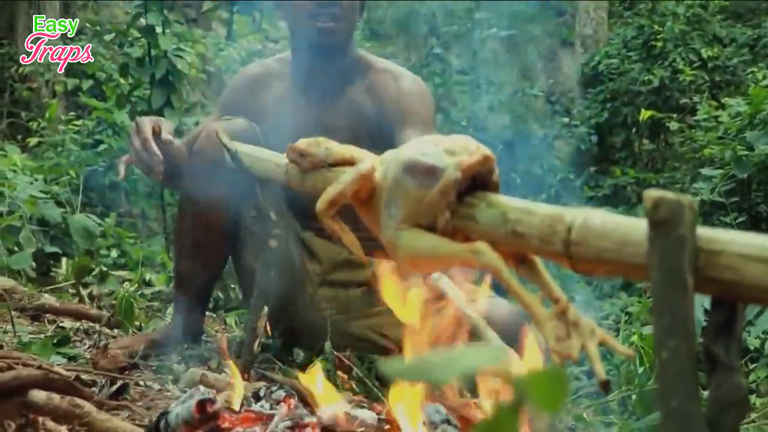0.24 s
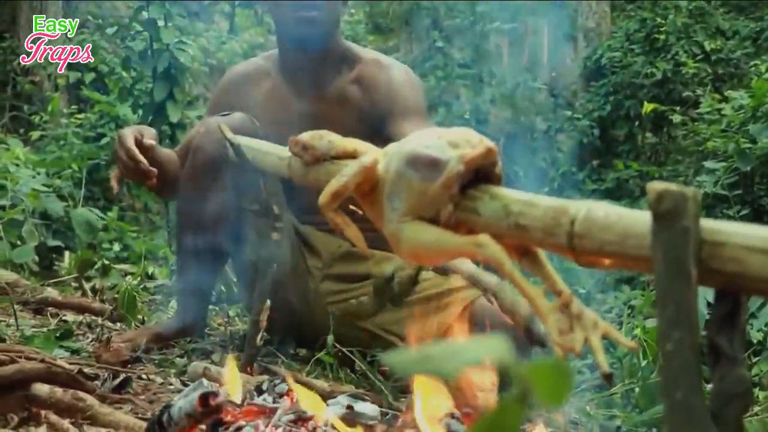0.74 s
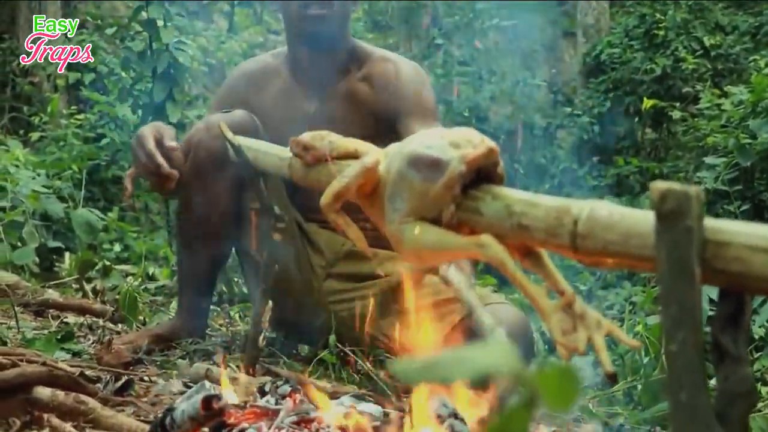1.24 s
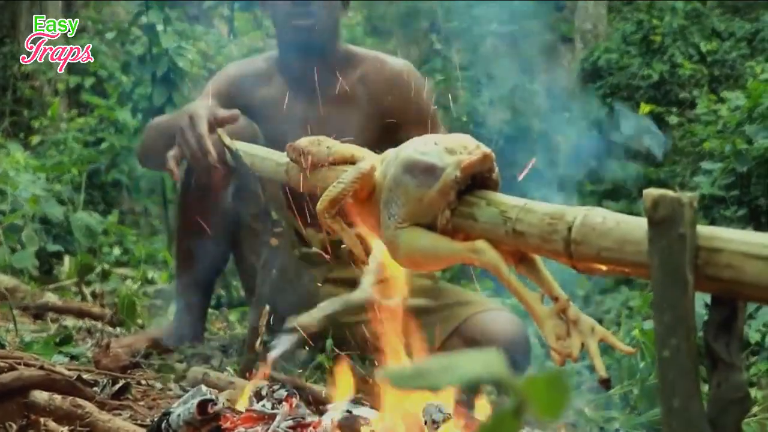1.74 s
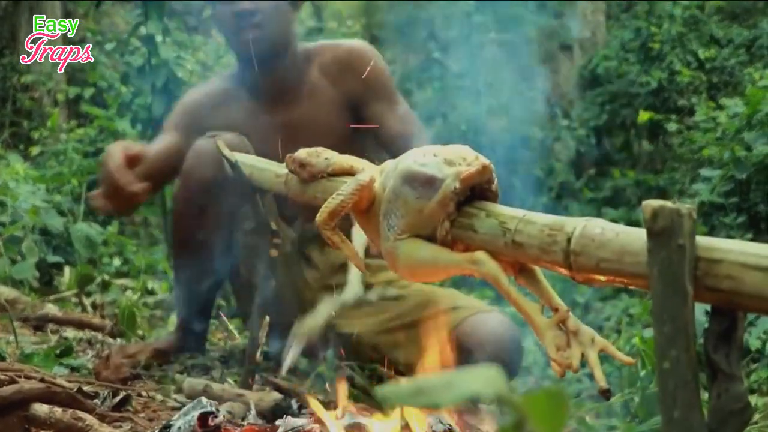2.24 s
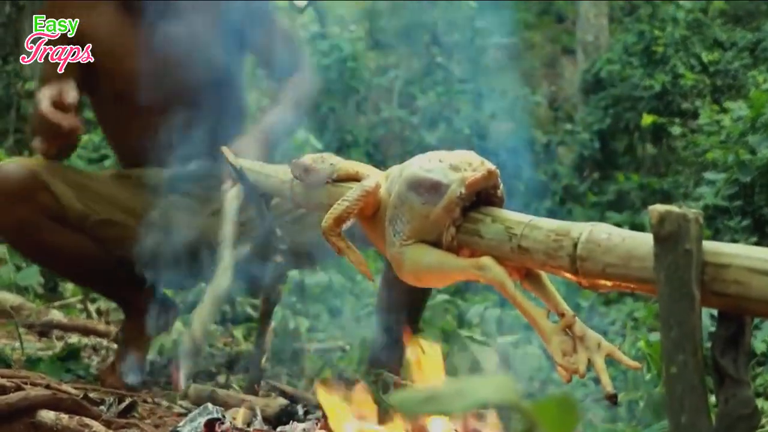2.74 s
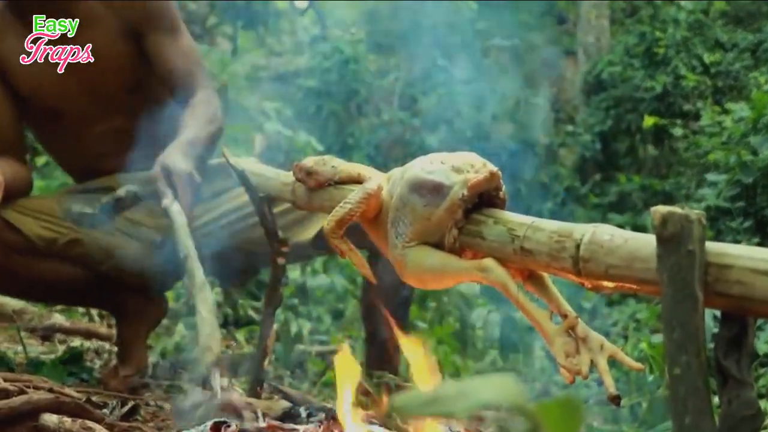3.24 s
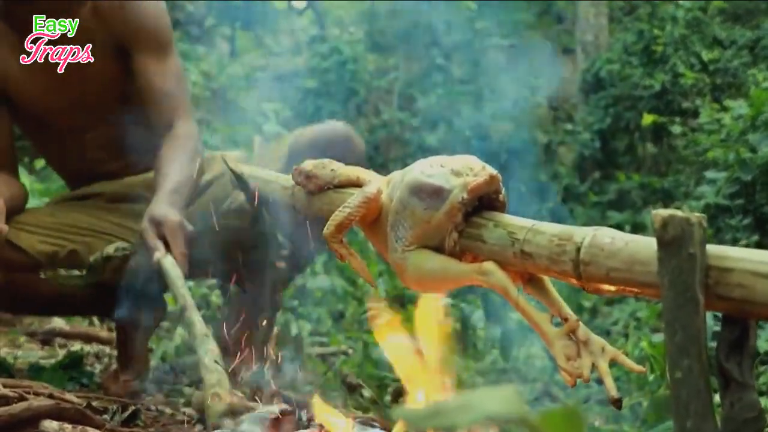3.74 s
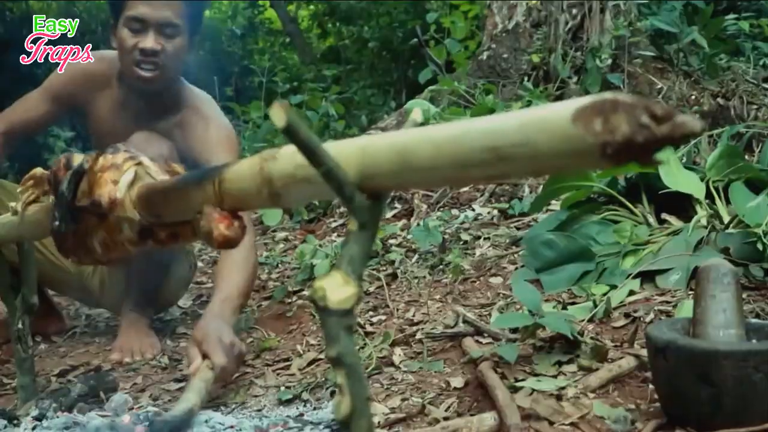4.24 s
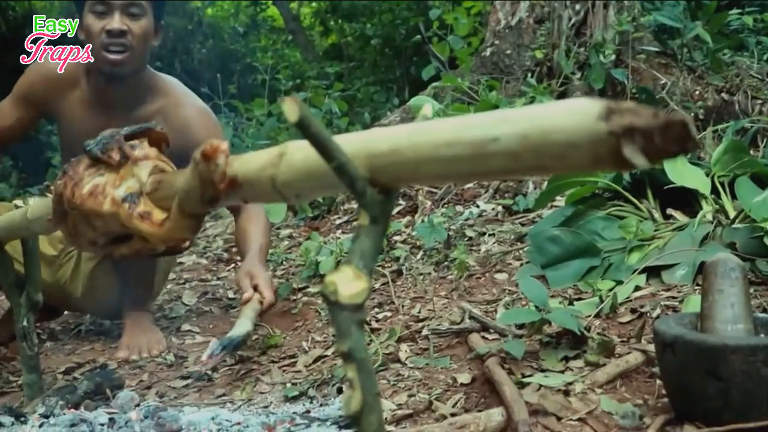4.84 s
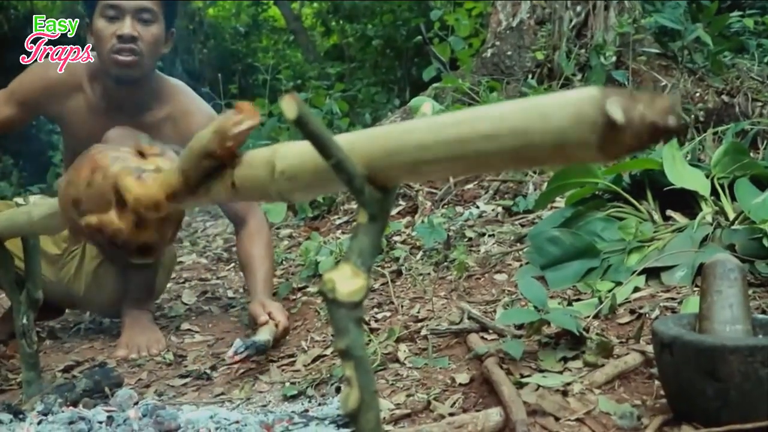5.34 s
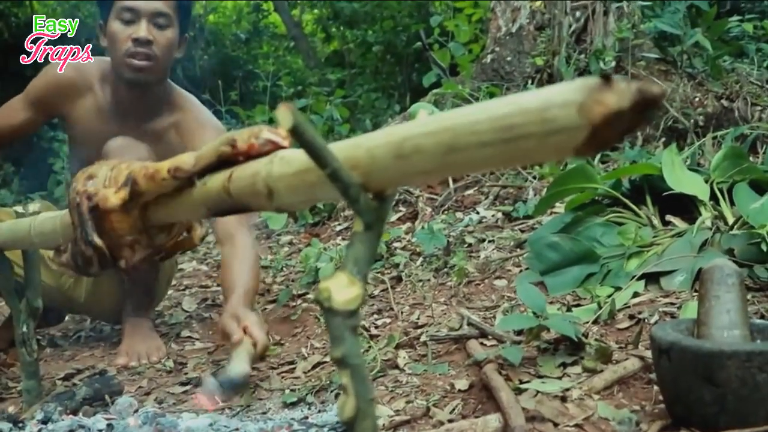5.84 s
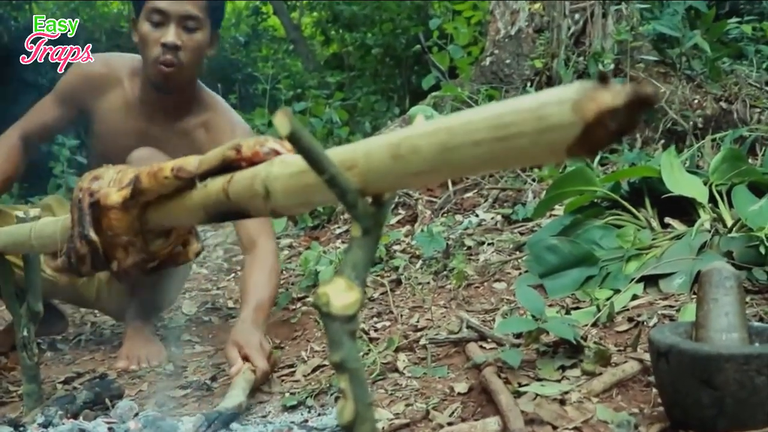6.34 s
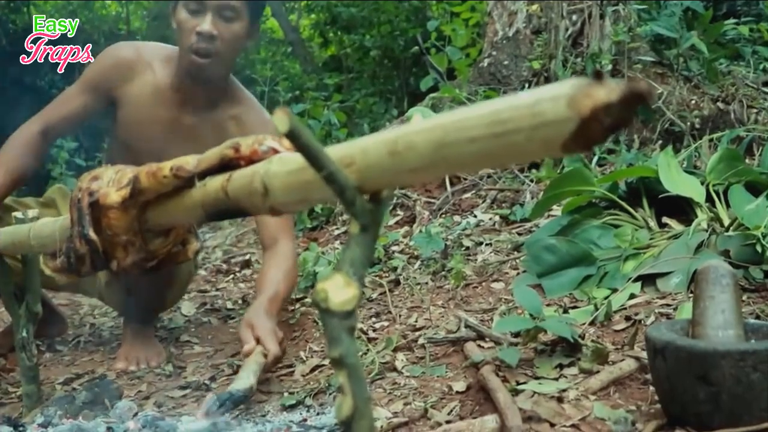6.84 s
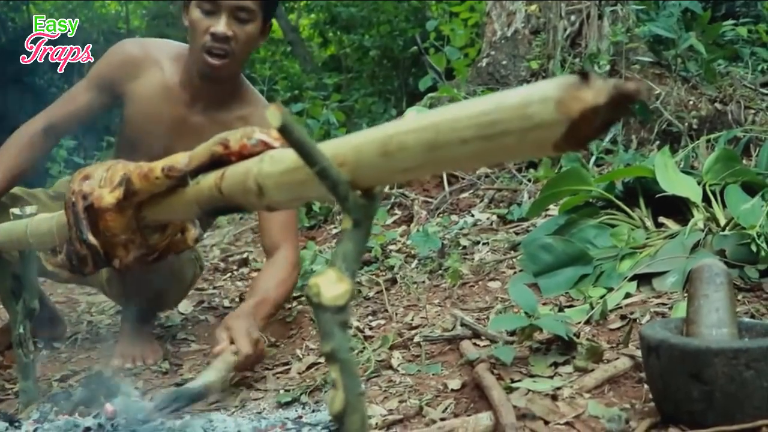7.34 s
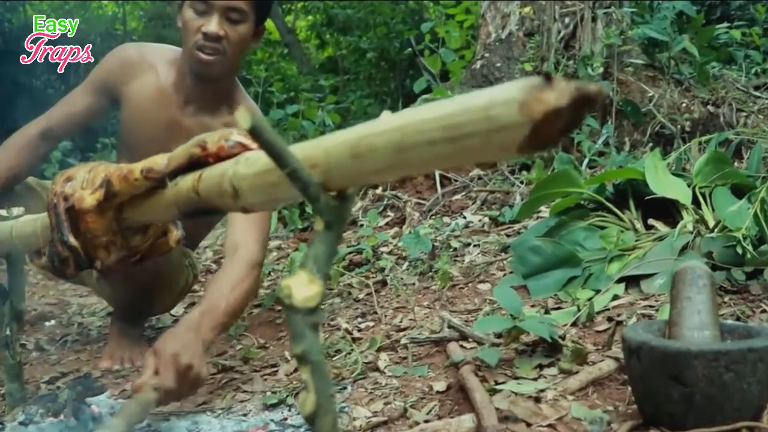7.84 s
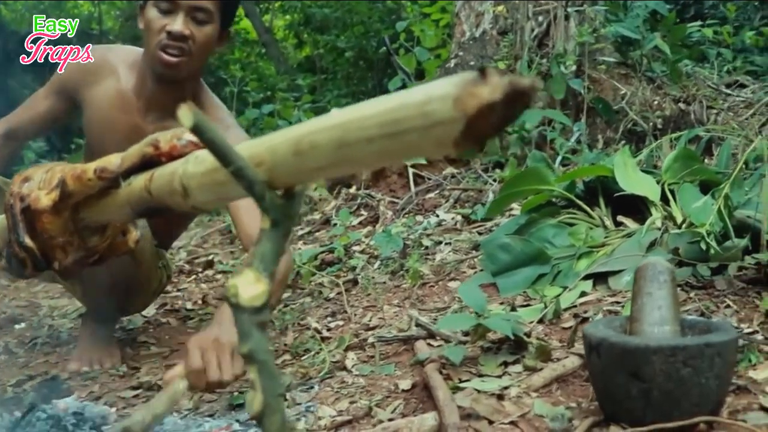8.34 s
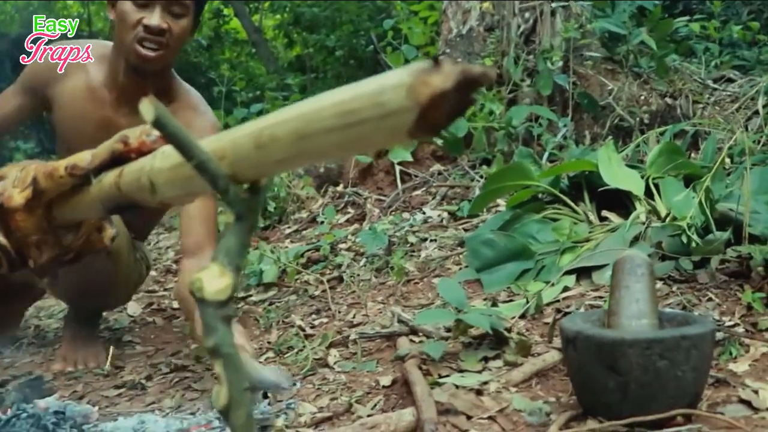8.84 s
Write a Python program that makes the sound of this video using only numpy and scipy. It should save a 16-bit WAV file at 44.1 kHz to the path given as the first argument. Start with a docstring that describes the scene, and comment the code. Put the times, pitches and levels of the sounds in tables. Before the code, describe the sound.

A mimicking bird hoots, trills and whistles among ringing forest trunks while a campfire hisses, snaps and a stick rakes the embers.

```python
"""Forest camp: a mimicking bird sings, centred and ringing among trunks, beside a stereo fire.
Its hoots, pips, rasps, trill and whistles are near sines that follow note tables and flutter.
The fire is patchy noise with rung noise bursts for snaps; a stick raking the embers swells the hiss.
A bamboo spit creaks twice in its fork: slip clicks and grit ring resonances that climb.
Air, insects and, at first, a low flapping of flames lie behind."""
import sys
import numpy as np
from scipy import signal
from scipy.fft import rfft, irfft, next_fast_len
from scipy.io import wavfile
from scipy.ndimage import uniform_filter1d

SR = 44100
rng = np.random.default_rng(int(sys.argv[2]) if len(sys.argv) > 2 else 0)


def int16_out(signal):
    """Quantize to a 16-bit WAV file."""
    q = np.round(np.clip(np.atleast_2d(signal).T, -1, 1) * 32767)
    wavfile.write(sys.argv[1], SR, q.astype(np.int16))


N = 400428
T = np.arange(N) / SR
SIDES = np.array([[1], [-1]])  # left, right in antiphase
TURN_S = 4.7  # until then the fire lies left, its hiss is duller and insects sound


def undb(db):
    """Amplitude ratio of a level in dB."""
    return 10 ** (np.asarray(db) / 20)


def unit(x):
    """Scale to RMS 1."""
    return x / np.sqrt(np.mean(x ** 2))


def ring(x, modes):
    """Sum of broad resonances, each (centre Hz, width Hz, gain dB)."""
    out = 0
    for hz, width_hz, db in modes:
        out = out + undb(db) * signal.lfilter(*signal.iirpeak(hz, hz / width_hz, SR), x)
    return out


def walk(rate_hz):
    """Random levels held 1 / rate_hz seconds and slewed twice; RMS 1."""
    k = int(SR / rate_hz)
    steps = np.repeat(rng.standard_normal(N // k + 1), k)
    slewed = uniform_filter1d(uniform_filter1d(steps, k), k)
    return unit(slewed[:N])


def colour(spectrum):
    """Steady noise of RMS 1, its spectrum drawn through (Hz, relative dB) points on a log axis."""
    hz, db = np.transpose(spectrum)
    f = np.maximum(np.fft.rfftfreq(N, 1 / SR), 1)
    gain = undb(np.interp(np.log(f), np.log(hz), db))
    return unit(irfft(rfft(rng.standard_normal(N)) * gain, N))


# Lone echoes off trunks. Each row: delay in seconds, level in dB re direct sound.
TRUNK_ECHOES = [(.004, -18), (.041, -19)]
WOOD_T60_S, NEAR_S, NEAR_DB = 0.46, 0.05, 5
WOOD_DB = -3  # scatter energy re direct sound, before its high-pass
CEILING = 0.18


def bird():
    """Song through the wood: lone echoes, dense near scatter, far tail; a limiter rounds the crests."""
    song = calls()
    high = signal.sosfilt(signal.butter(4, 1500, "high", fs=SR, output="sos"), song)
    squared = high ** 2
    octave = unit(squared - uniform_filter1d(squared, size=40))
    song = song + undb(-34) * octave * np.std(song)

    t = T[:SR]
    near = undb(NEAR_DB / (1 + (t / NEAR_S) ** 8))
    onset = np.clip(t / 0.0025, 0, 1)
    wood = rng.standard_normal(SR) * undb(-60 * t / WOOD_T60_S) * near * onset
    wood *= undb(WOOD_DB) / np.sqrt(np.sum(wood ** 2))
    wood = signal.lfilter(*signal.butter(1, 1400, "high", fs=SR), wood)  # low notes bend round trunks
    wood[0] = 1  # direct sound
    for delay_s, db in TRUNK_ECHOES:
        wood[int(delay_s * SR)] += undb(db)
    wet = signal.fftconvolve(song, wood)[:N]

    envelope = np.abs(signal.hilbert(wet, next_fast_len(N))[:N])
    held = wet / (1 + (envelope / CEILING) ** 8) ** (1 / 8)
    return held / (1 + (.93 * held / CEILING) ** 8) ** (1 / 8)


def calls():
    """Every note of the song, each kind in its own voice."""
    return (trill() + hoots() + clear_whistles() + pips() + rasps() + rattle()
            + warbles() + ripples() + buzzes() + tweets() + burr())


# Trill. Each row: start in seconds, top pitch in Hz.
TRILL = [(1.955, 6410), (2.043, 6430), (2.132, 6580), (2.229, 6470), (2.322, 6410), (2.417, 6330),
         (2.518, 6290), (2.618, 6210)]
# Whip, lead whip just ahead, half-pitch line.
# Each row: seconds from stroke start, share of top pitch, level in dB re TRILL_DB.
STROKE = [(-.002, .4, -22), (.001, .62, -2), (.004, .8, 0), (.008, .94, -14), (.022, 1.0, -9),
          (.055, 1.0, -13)]
LEAD = [(-.006, .5, -9), (-.001, .86, -5)]
UNDER = [(-.007, .22, -14), (-.002, .3, -11), (.002, .4, -32), (.012, .49, -17), (.045, .5, -21)]
TRILL_DB = -30


def trill():
    """Each stroke whips up twice to a held top note; a half-pitch line sounds under it."""
    def strokes(shape):
        return [[(s + dt, part * top_hz, TRILL_DB + db) for dt, part, db in shape] for s, top_hz in TRILL]

    whips = sing(strokes(STROKE) + strokes(LEAD), "whip")
    return whips + sing(strokes(UNDER), "clear")


# First hoot in two parts, then the arched one. Each row: time in seconds, pitch in Hz, level in dB.
HOOT_THROB = [(0, 828.5, -19.5), (.11, 718.3, -24)]
HOOT_SMOOTH = [(.11, 745, -17), (.19, 665, -26), (.24, 671, -31.5)]
HOOT_ARCH = [(.445, 694, -22), (.461, 740, -42), (0.468, 798.4, -9.5), (0.549, 783.7, -22.5),
             (0.587, 598, -29.5)]
# Each row: multiple of the pitch, level in dB re fundamental.
LOW_OVERTONES = [(3, -33), (5, -30)]


def hoots():
    """Two hoots: the first starts with a throb and then runs smooth, the second is an arch."""
    throbbing = sing([HOOT_THROB], "hoot", LOW_OVERTONES)
    return throbbing + sing([HOOT_SMOOTH, HOOT_ARCH], "coo", LOW_OVERTONES)


# Notes. Each row: start in seconds, length in seconds, pitch in Hz, level in dB.
RISES = [(2.73, 0.097, 2117, -24.5), (2.885, 0.1, 2040, -24), (3.06, 0.12, 2011, -27)]
DROPS = [(3.275, .035, 2750, -28.5), (3.62, 0.035, 2850, -22)]
HOOKS = [(4.537, 0.058, 3680, -20), (5.105, 0.049, 3610, -19), (5.678, 0.064, 3457, -25)]
PEEPS = [(4.645, 0.055, 4764, -28.5), (5.205, 0.072, 4690, -26), (5.79, 0.081, 4680, -26.5)]
FALLS = [(4.195, 0.068, 3256, -21), (4.738, 0.076, 3250, -22), (5.31, 0.076, 3205, -18.5)]
KICKS = [(4.43, 0.043, 2920, -23.5), (4.985, 0.05, 2856, -20), (5.585, 0.028, 2757, -20.5)]
LIFTS = [(6.41, 0.15, 3209, -21), (7.065, 0.12, 3214, -19.5), (7.74, .14, 3160, -20)]
# Their shapes. Each row: share of length, share of pitch, level in dB re note.
RISE = [(0, .85, -10), (0.151, .95, -6.5), (0.601, 1.05, 0.5), (.85, 1.25, -4), (1, 1.325, -0.5)]
DROP = [(0, 1.38, -19.5), (.85, 1, 1.5), (1, .95, -31)]
HOOK = [(0, .7, -16), (0.121, .93, -1), (.3, 1, -5.5), (.75, 1.02, 0), (1, 1.02, -4.5)]
PEEP = [(0, 1.0, -5), (.15, .97, -1), (.6, 1.03, 3), (1, 1.02, -12)]
FALL = [(0, 1.26, -5.5), (0.301, 1.08, -5), (.65, .98, 0), (1, .82, -9.5)]
KICK = [(0, .98, 9.5), (.2, 1, -4.5), (.5, 1.02, 1.5), (.8, 1.15, -2.5), (1, 1.144, -25)]
LIFT = [(0, .96, -10.5), (.38, .98, -1), (0.451, .99, 2), (.75, 1.04, -5), (1, 1.2, -16)]
# Single notes. Each row: time in seconds, pitch in Hz, level in dB.
SLUR = [(1.22, 1164, -48.5), (1.27, 1340, -36.5), (1.295, 1576, -31), (1.35, 1453, -45.5)]
THIN = [(1.44, 6560, -47), (1.48, 6500, -53)]
CLIMB = [(4.08, 2300, -46.5), (4.092, 3876, -20), (4.131, 4080, -22), (4.144, 4480, -29)]


def clear_whistles():
    """Lightly fluttering pure whistles: repeated kinds share a shape, three notes are single."""
    kinds = [(RISES, RISE), (DROPS, DROP), (HOOKS, HOOK), (PEEPS, PEEP),
             (FALLS, FALL), (KICKS, KICK), (LIFTS, LIFT)]
    notes = [SLUR, THIN, CLIMB]
    for rows, shape in kinds:
        notes = notes + shaped(rows, shape)
    return sing(notes, "clear")


# Each row: start in seconds, length in seconds, pitch in Hz, level in dB.
PIPS = [(.82, .035, 1253, -41), (.915, 0.036, 1200, -42.5), (1.025, 0.038, 1060, -47),
        (1.11, .042, 1060, -46.5)]
# Each row: share of length, share of pitch, level in dB re note.
PIP = [(0, 1.02, 1), (1, .82, -6.5)]
PIP_OCTAVE_DB = -6


def pips():
    """Short falling pips with an octave that comes and goes."""
    return sing(shaped(PIPS, PIP), "clear", [(2, PIP_OCTAVE_DB)])


# One list a rasp. Each row: time in seconds, pitch in Hz, level in dB.
RASPS = [
    [(1.425, 3500, -39), (1.44, 4230, -41), (1.5, 4200, -47)],
    [(1.779, 4300, -34), (1.787, 4400, -24.5), (1.9, 2890, -35)],
]
# Each row: multiple of the pitch, level in dB re main line.
RASP_UNDERTONE = [(.5, -19)]


def rasps():
    """Fast, ragged, wide flutter over a half-pitch undertone that comes and goes."""
    return sing(RASPS, "rasp", RASP_UNDERTONE)


# Upper and lower voice. Each row: time in seconds, pitch in Hz, level in dB.
RATTLE = [(1.54, 2890, -37), (1.553, 3790, -35.5), (1.59, 2830, -39), (1.725, 2893, -33)]
RATTLE_LOW = [(1.6, 2185, -48), (1.724, 1764, -39)]


def rattle():
    """Two voices at once with very ragged flutter."""
    return sing([RATTLE, RATTLE_LOW], "rattle")


# Each row: start in seconds, length in seconds, pitch in Hz, level in dB, warble rate in Hz.
WARBLES = [(4.28, .15, 2737, -26.5, 30.9), (4.816, 0.165, 2790, -25.5, 29.28),
           (5.401, .185, 2776, -25.5, 42.3)]
# Each row: share of length, share of pitch, level in dB re note.
WARBLE = [(0, .87, -8.5), (0.999, 0.96, -0.5)]


def warbles():
    """Rising whistles swung in pitch and level, each at its own rate."""
    out = np.zeros(N)
    for *note, rate_hz in WARBLES:
        out += sing(shaped([note], WARBLE), "warble", pace_hz=rate_hz)
    return out


# Each row: start in seconds, length in seconds, pitch in Hz, level in dB.
RIPPLES = [(3.372, .138, 3258, -22), (3.72, .145, 3154, -20.5)]
# Each row: share of length, share of pitch, level in dB re note.
RIPPLE = [(0, 1.32, -6.5), (0.071, 1.14, -14), (.2, 1.04, -2), (0.548, 1, -1), (.88, .97, -6.5),
          (1, 0.8545, -7.5)]


def ripples():
    """Falling whistles with a light wobble of pitch."""
    return sing(shaped(RIPPLES, RIPPLE), "ripple")


# Each row: start in seconds, length in seconds, pitch in Hz, level in dB.
BUZZES_DOWN = [(5.9, 0.18, 3128, -19.5), (6.6, 0.16, 3126, -22.5), (7.25, 0.18, 3242, -23.5),
               (7.94, .158, 3194, -23)]
BUZZES_UP = [(6.13, 0.08, 3260, -19), (6.81, 0.11, 3291, -19.5), (7.5, .082, 3283, -23)]
# Each row: share of length, share of pitch, level in dB re note.
BUZZ_DOWN = [(0, 1.21, -12.5), (.1, 1.09, -6.5), (.36, 1.0, -0.5), (0.719, .85, -5.5), (1, .7, -10.5)]
BUZZ_UP = [(0, .71, -12.5), (.68, 1, -2), (1, 1.27, -6.5)]


def buzzes():
    """Falling and rising whistles whose very fast flutter widens where they are soft."""
    notes = shaped(BUZZES_DOWN, BUZZ_DOWN) + shaped(BUZZES_UP, BUZZ_UP)
    return sing(notes, "buzz", fray=0.066)


# Each row: start in seconds, length in seconds, pitch in Hz, level in dB.
TWEETS = [(6.255, 0.11, 5090, -33), (6.965, 0.067, 5085, -28), (7.635, .062, 4990, -32)]
# Each row: share of length, share of pitch, level in dB re note.
TWEET = [(0, 1.03, -2), (.8, 1, 2.5), (1, .78, 1)]


def tweets():
    """High fluttered notes that drop in pitch at the end."""
    return sing(shaped(TWEETS, TWEET), "tweet")


# Each row: time in seconds, pitch in Hz, level in dB.
BURR = [(3.92, 2514, -37), (3.95, 2494, -32), (3.985, 2890, -26.5), (4.008, 3140, -45)]


def burr():
    """One rising note roughened by fast, wide flutter."""
    return sing([BURR], "burr")


def shaped(rows, shape):
    """Stretch one shape to the length, pitch and level of every row."""
    return [[(s + share * length_s, part * hz, db + d) for share, part, d in shape]
            for s, length_s, hz, db in rows]


# Flutter by voice. Each entry: rate in Hz, pitch swing in Hz, raggedness 0-1,
# throb of level as a share (negative starts loud).
FLUTTER = {"hoot": (53, 45, .25, -.9), "coo": (36, 10, .3, .1), "clear": (36, 19, .36, .05),
           "ripple": (28, 110, .15, .1), "warble": (31, 190, .2, .5), "rattle": (95, 330, .7, .3),
           "rasp": (86, 600, .4, .3), "buzz": (240, 125, .3, .15), "tweet": (120, 187, .3, .1),
           "whip": (80, 40, .4, .3), "burr": (130, 330, .3, .2)}


def sing(notes, kind, overtones=(), pace_hz=None, edge_s=0.003, fray=0):
    """Near sine along each note, pitch and level fluttering together; fray widens the soft swing."""
    rate_hz, swing_hz, ragged, throb = FLUTTER[kind]
    pace = (pace_hz or rate_hz) * (1 + .2 * ragged * walk(rate_hz / 2))
    jitter = ragged * walk(5 * rate_hz)
    broken = undb(5.0 * walk(45))  # overtones come and go
    out = np.zeros(N)
    for note in notes:
        s, hz, db = np.transpose(note)
        span = (T >= s[0]) & (T < s[-1])
        t = T[span]
        level_db = np.interp(t, s, db)
        beat = jitter[span] - np.cos(2 * np.pi * np.cumsum(pace[span]) / SR)
        edges = np.clip(np.minimum(t - s[0], s[-1] - t) / edge_s, 0, 1)
        throbbing = 1 + np.clip(throb, -1, 1) * beat
        softness_db = np.interp(t, s, max(db) - db)
        pitch_hz = np.interp(t, s, hz) + swing_hz * (1 + fray * softness_db) * beat
        phase = 2 * np.pi * np.cumsum(pitch_hz) / SR
        partials = sum(undb(d) * np.sin(round(2 * k) / 2 * phase) for k, d in overtones)
        tone = np.sin(phase) + broken[span] * partials
        out[span] += np.sqrt(2) * edges * throbbing * undb(level_db) * tone
    return out


# Fire snaps and stick knocks. Each row: start in seconds, gain in dB, thud gain in dB re crack gain.
SNAPS = [(0.085, -27, -24.5), (0.426, -24.5, -29), (0.8123, -16.5, -31.5), (0.9961, -18, -31),
         (1.1965, -20, -25), (1.3823, -17, -25.5), (1.8212, -35, -11), (3.1464, -34, -29), (3.276, -39, -5),
         (3.343, -53.5, 8.5), (3.6035, -23.5, -36.5), (3.6165, -25, -32.5), (3.88, -39, -33),
         (4.0624, -28.5, -21.5), (5.96, -48, -4.5), (7.6266, -34.5, -27), (8.433, -29.5, -25.5),
         (8.958, -34, -26)]
# Crack and thud resonances. Each row: centre in Hz, width in Hz, gain in dB.
CRACK_MODES = [(2420, 970, -0.5), (4100, 2500, 3), (7300, 2260, 1), (11500, 11000, -34)]
THUD_MODES = [(235, 363, 32), (720, 2800, 16.5)]
LEFT_DB = 8  # left over right for thuds before TURN_S


def snaps():
    """A noise crack of about 2 ms, a fainter spray and a dull thud; from the left before TURN_S."""
    out, t = np.zeros((2, N + SR)), T[:SR // 8]
    decay = np.exp(-(t / .0021) ** 2) + undb(-11.5) * np.exp(-t / 0.019)  # crack, then spray
    for s, db, thud_db in SNAPS:
        mid, side = rng.standard_normal((2, len(t))) * decay
        crack = ring(mid + 0.73 * side * SIDES, CRACK_MODES)
        thud = ring(rng.standard_normal(len(t)) * np.exp(-t / 0.0095), THUD_MODES)
        pan_db = (s < TURN_S) * LEFT_DB * SIDES / 2
        snap = crack * undb(0.38 * pan_db) + thud * undb(thud_db + pan_db)
        i = int(s * SR)
        out[:, i:i + len(t)] += snap * undb(db)
    return out[:, :N]


# Each row: start in seconds, length in seconds, gain in dB, upper resonance in Hz at start
# and at end of its climb, climb in seconds.
CREAKS = [(4.532, 0.37, -38, 1860, 2150, .12), (8.237, 0.48, -40, 1692, 2070, .4)]
# Each row: share of length, gain in dB re creak.
CREAK_SHAPE = [(0, -3), (0.041, -3), (.2, 4), (.4, -3), (.8, -4), (1.1, -19)]
# Lower resonances (before loading). Each row: centre in Hz, half width in Hz, gain in dB.
BAMBOO = [(1002, 104, 1), (1540, 116, -6)]


def creak():
    """Uneven stick-slip clicks and grit ring the bamboo; resonances climb and waver as the spit turns."""
    turns = np.cumsum(100 * (1 + .25 * walk(60))) / SR  # about 100 slips a second
    slips = np.diff(np.floor(turns), prepend=0) * np.sign(walk(200))

    def rung(hz, half_width_hz):
        """A narrow low-passed rub shifted up to a moving resonance, with its own grit."""
        rub = slips + .09 * rng.standard_normal(N)
        narrow = signal.lfilter(*signal.butter(2, half_width_hz, fs=SR), rub)
        return unit(np.cos(2 * np.pi * np.cumsum(hz) / SR) * narrow)

    share, shape_db = np.transpose(CREAK_SHAPE)
    out = np.zeros(N)
    for start, length_s, db, from_hz, to_hz, climb_s in CREAKS:
        loading = np.interp(T, [start, start + 0.0692], [.86, 1]) * (1 + .04 * walk(15))
        body = sum(undb(d) * rung(hz * loading, half_hz) for hz, half_hz, d in BAMBOO)
        upper_hz = np.interp(T, [start, start + climb_s], [from_hz, to_hz])
        body = body + undb(-5.5) * rung(upper_hz, 126)
        out += body * undb(np.interp(T, start + share * length_s, db + shape_db, -120, -120))
    return out * undb(2.5 * SIDES)


# Hiss and air spectra. Each row: frequency in Hz, relative density in dB per Hz.
EMBERS = [(300, -37), (1500, 2), (8000, -1), (13500, -2.5), (16000, -14)]
AIR = [(15, -47), (28, -3.5), (159, -0.5), (1350, -9.5), (3000, -15.5), (8000, -22), (10000, -37)]
AIR_DB = -48.5  # mean gain


def fire():
    """Wide patchy hiss and tiny crackles over a murmur of flames, air and insects; dull before TURN_S."""
    stir_db = stirring()
    sizes_db = np.minimum(4.0 * rng.exponential(size=N), 10)
    clicks = (rng.random(N) < 80 / SR) * undb(sizes_db + 23.5)  # about 80 a second
    grit = ring(clicks, [(4800, 4900, 0.0049)])
    side = 0.42 * colour(EMBERS) + ring(colour(EMBERS), [(13100, 11000, 0.67)])
    hiss = colour(EMBERS) + grit + side * SIDES
    dull = signal.sosfilt(signal.butter(2, 10500, fs=SR, output="sos"), hiss)
    hiss = np.where(T < TURN_S, dull, hiss) * undb(stir_db + 2.0 * walk(17))

    murmur = colour(AIR) * undb(np.array([[2.0], [-3.0]])) + 0.5 * np.array([colour(AIR), colour(AIR)])
    lift_db = 0.38 * (stir_db - np.mean(stir_db))  # stirring lifts the murmur a little too
    murmur = murmur * undb(AIR_DB + lift_db + 1.5 * walk(2.88))
    insects = undb(-49) * (T < TURN_S) * ring(rng.standard_normal((2, N)), [(8200, 1300, 0)])
    return hiss + insects + murmur


# Slowly changing ember hiss. Each row: time in seconds, gain in dB.
EMBER_HISS = [(0, -43.5), (.4, -58), (1.6, -55), (3.0, -57), (5.0, -59), (5.6, -65.5), (5.8, -52.5),
              (7.9, -56.5), (8.2, -62), (9.08, -50.5)]
# Each row: peak time in seconds, peak gain in dB, rise in seconds, fall in seconds.
RAKES = [(.11, -39.5, 0.014, 0.094), (0.502, -42, 0.024, 0.18), (3.308, -40, 0.032, 0.13),
         (3.781, -45, 0.12, 0.095), (4.22, -42, 0.04, 0.099), (5.3, -46.5, 0.23, 0.2),
         (6.12, -44.5, 0.077, 0.06), (7.04, -52.5, 0.31, 0.63), (7.55, -45, 0.056, 0.54),
         (8.47, -43, 0.19, 0.24), (8.97, -40, 0.012, 0.12)]
RAKE_FADE_DB = 12.5  # lost over one rise or fall time


def stirring():
    """Hiss gain in dB: changing embers plus one swell, summed in power, for each rake of the stick."""
    power = undb(2 * np.interp(T, *np.transpose(EMBER_HISS)))
    for s, db, rise_s, fall_s in RAKES:
        away = np.maximum((s - T) / rise_s, (T - s) / fall_s)
        power = power + undb(2 * (db - RAKE_FADE_DB * away))
    return 10 * np.log10(power)


# Each row: frequency in Hz, relative density in dB per Hz.
FLAMES = [(30, -5), (70, 2), (150, 3.5), (450, -28.5)]
FLAMES_END_S, FLAMES_DB = 4.7, -55.5


def flames():
    """Low flapping rumble while the flames stand high: wavering noise, weighted to the left."""
    rumble = colour(FLAMES) * undb(2.5 * SIDES) + 0.9 * np.array([colour(FLAMES), colour(FLAMES)])
    return rumble * (T < FLAMES_END_S) * undb(FLAMES_DB + 2 * walk(2.96))


OFFSET_ON_S, OFFSET_OFF_S, OFFSET_EDGE_S, OFFSET_SIZE = 0.757, 8.38, 0.01, 0.013


def offset():
    """Steady offset of the signal between two times, with ramped edges."""
    inside_s = np.minimum(T - OFFSET_ON_S, OFFSET_OFF_S - T)
    return OFFSET_SIZE * np.clip(inside_s / OFFSET_EDGE_S + .5, 0, 1)


def scene():
    """Bird and offset in the centre, fire and spit in stereo."""
    return bird() + offset() + snaps() + creak() + fire() + flames()


TOP_HZ = 16200


def record(dry):
    """The recorder cuts the top: a steep low-pass."""
    return signal.sosfilt(signal.ellip(10, .2, 80, TOP_HZ, fs=SR, output="sos"), dry)


dry = scene()
out = record(dry)
int16_out(out)
```